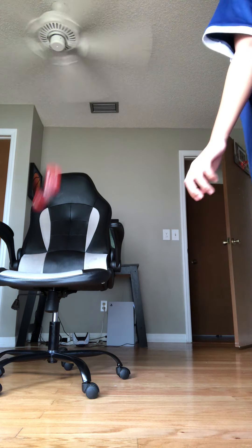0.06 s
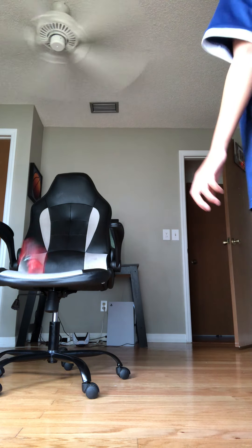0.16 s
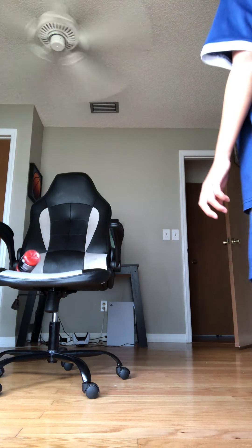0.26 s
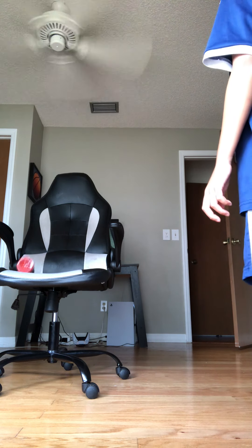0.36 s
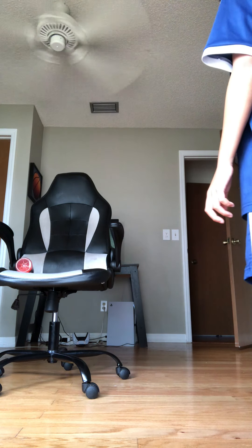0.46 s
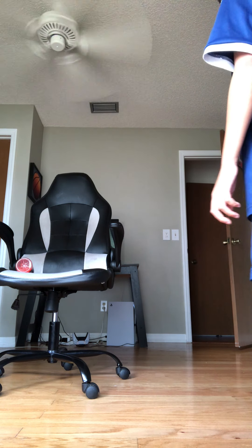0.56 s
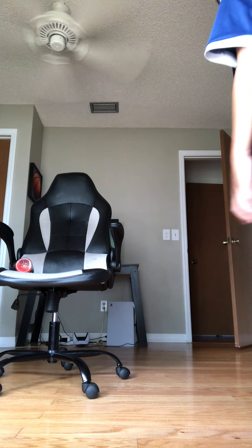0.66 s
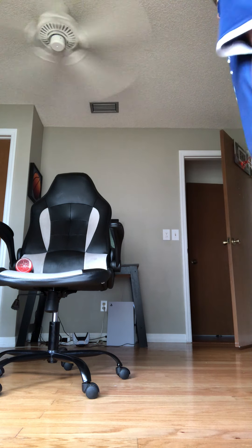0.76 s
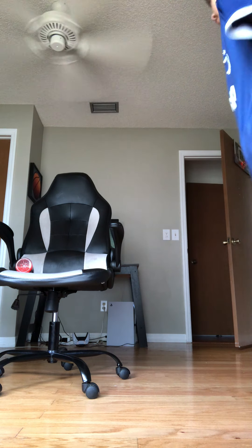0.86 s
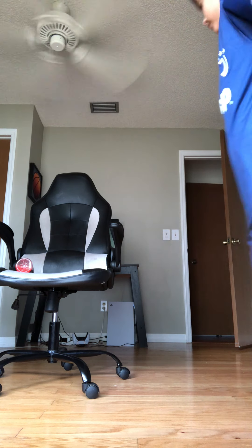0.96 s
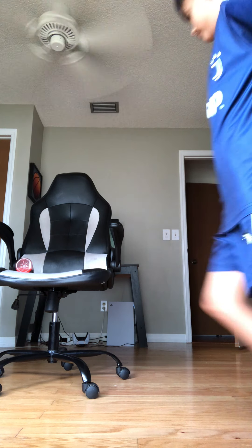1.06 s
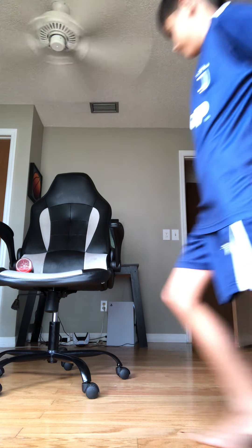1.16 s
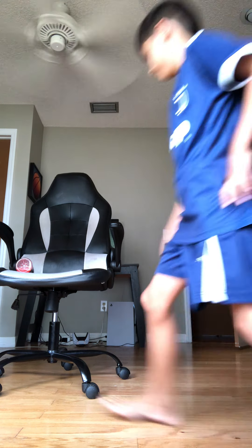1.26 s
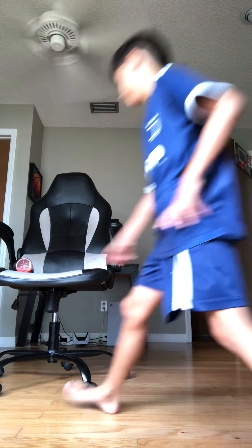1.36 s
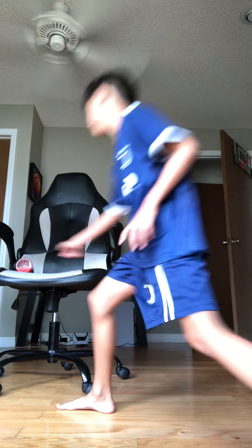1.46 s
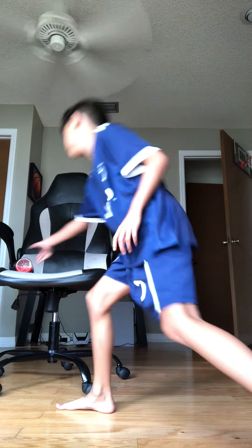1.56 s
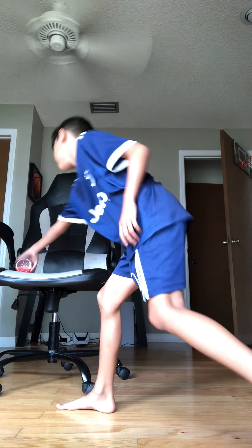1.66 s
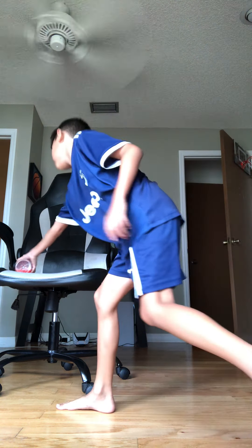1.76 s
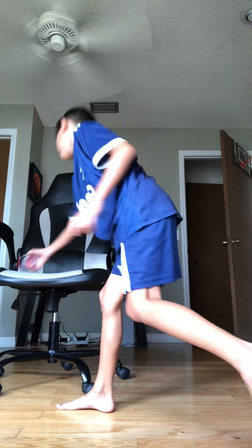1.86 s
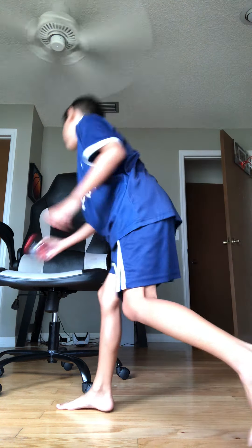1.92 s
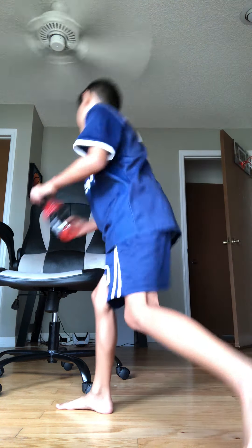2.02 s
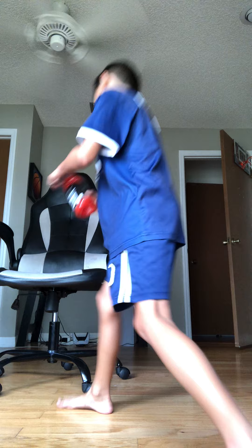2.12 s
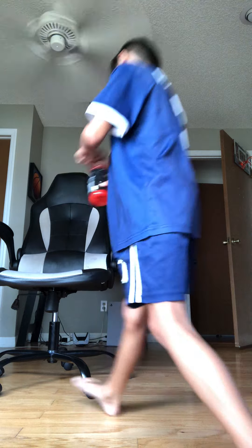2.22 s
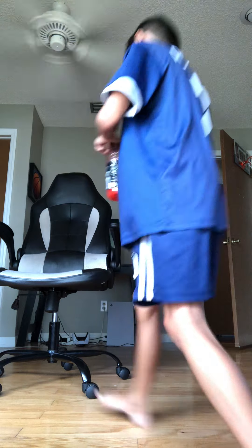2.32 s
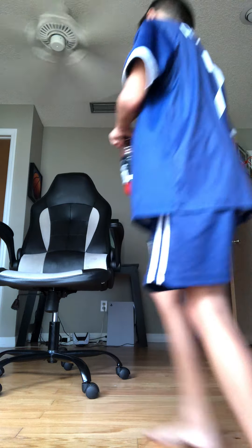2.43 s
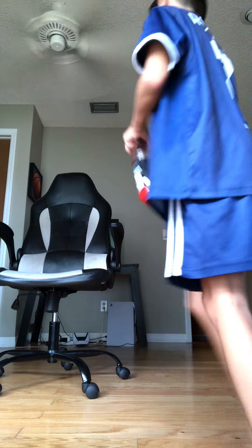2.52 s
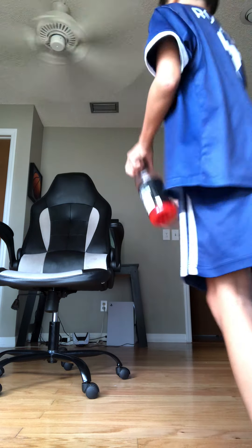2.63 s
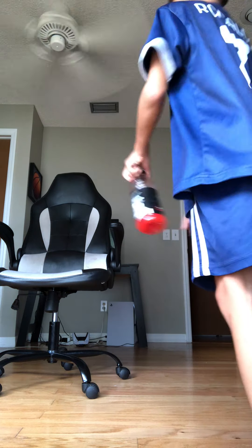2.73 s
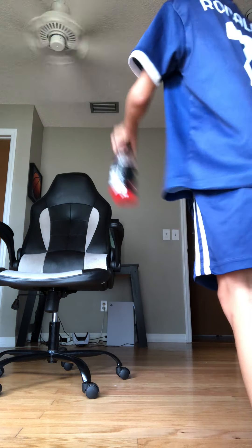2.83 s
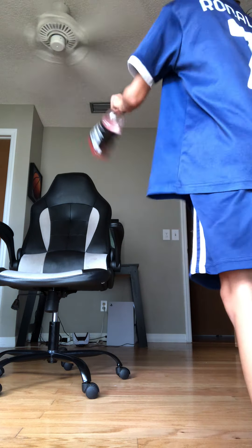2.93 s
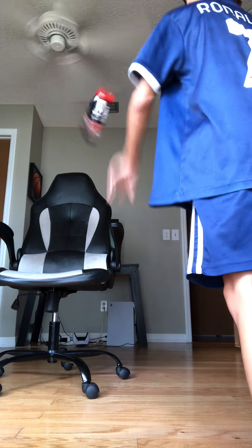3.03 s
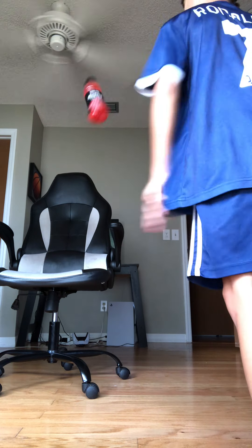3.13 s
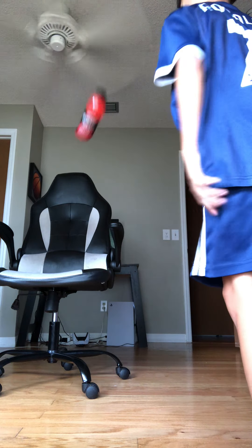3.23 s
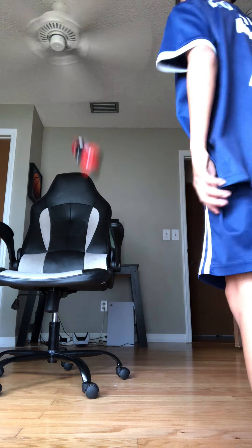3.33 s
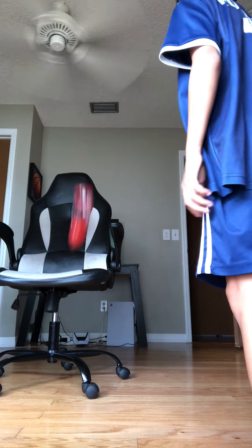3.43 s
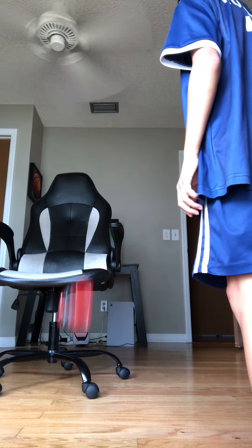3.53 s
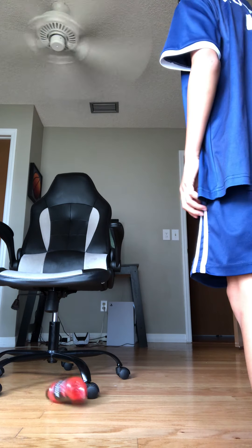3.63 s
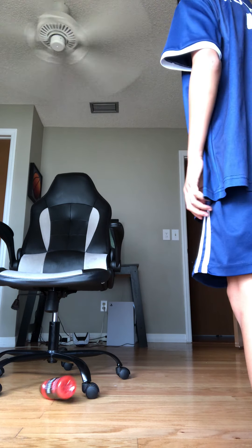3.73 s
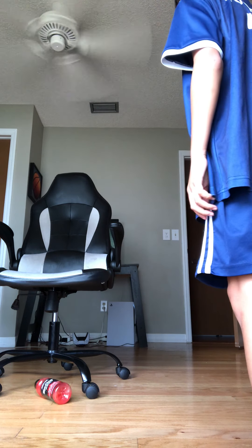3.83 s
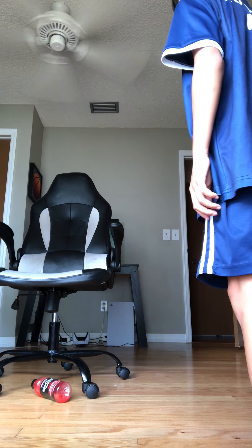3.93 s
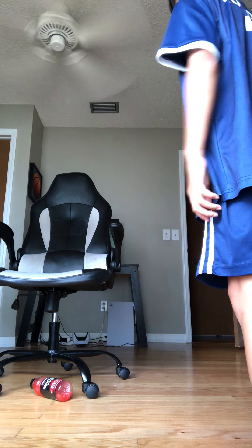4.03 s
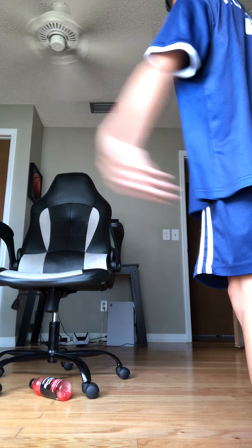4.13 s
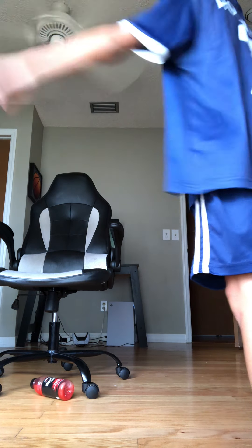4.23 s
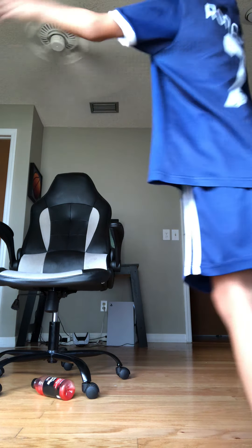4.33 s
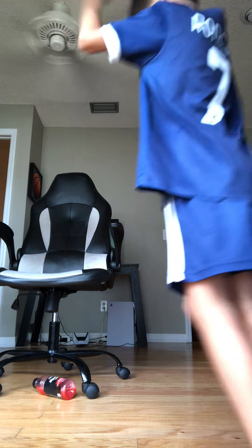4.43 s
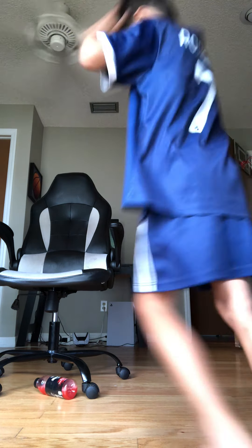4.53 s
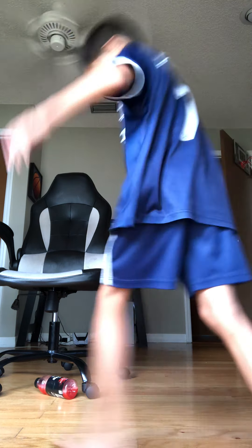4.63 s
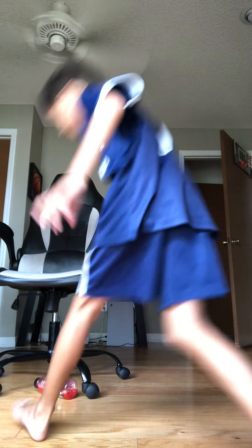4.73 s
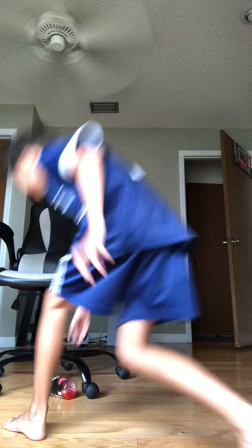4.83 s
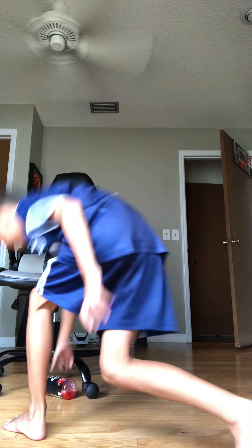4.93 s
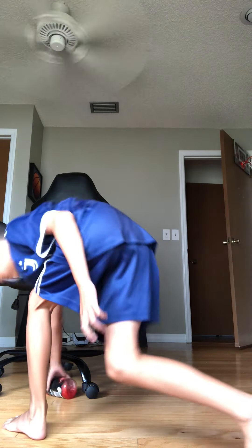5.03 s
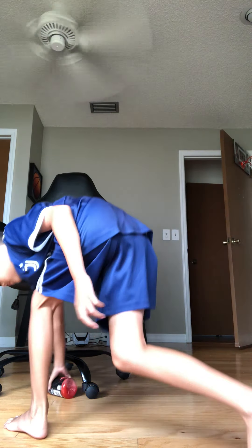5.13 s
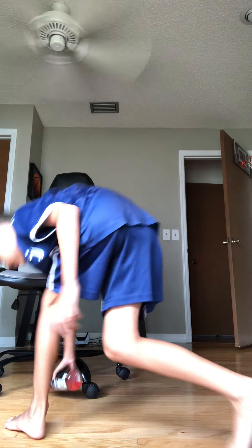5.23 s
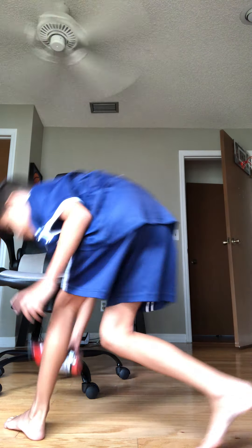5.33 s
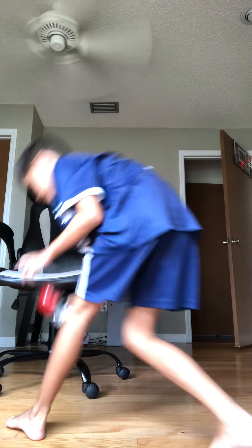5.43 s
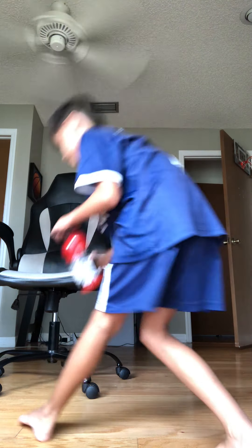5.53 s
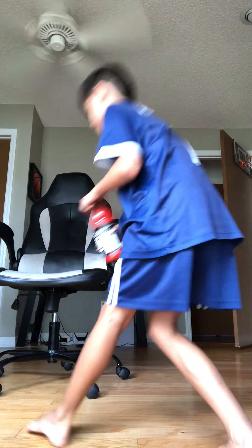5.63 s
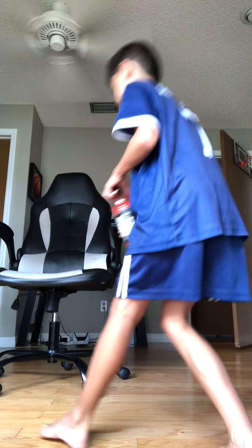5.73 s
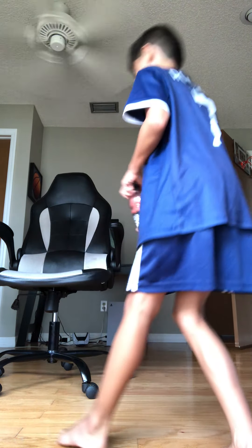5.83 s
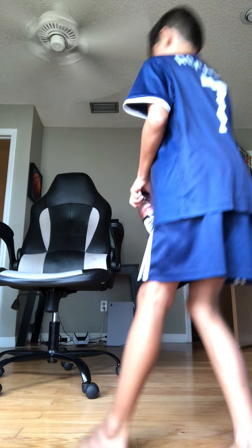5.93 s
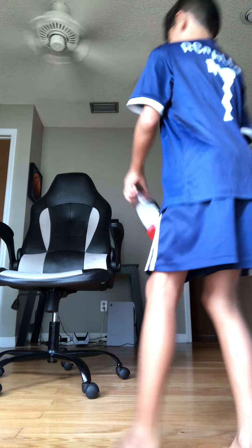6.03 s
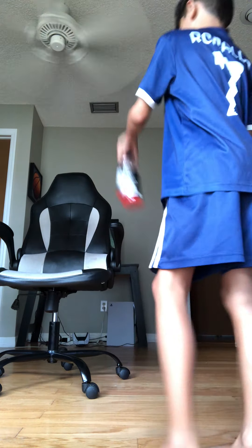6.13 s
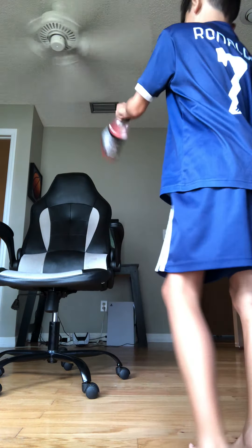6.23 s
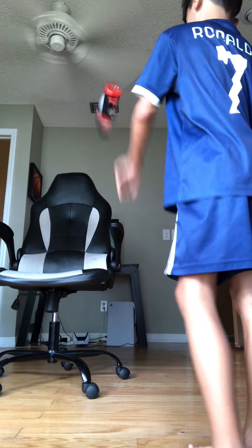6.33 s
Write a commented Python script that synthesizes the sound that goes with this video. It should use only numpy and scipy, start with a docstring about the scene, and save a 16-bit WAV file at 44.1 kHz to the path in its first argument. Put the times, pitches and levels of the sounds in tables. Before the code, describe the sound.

Bottle flipping indoors: dull slap on a cushioned seat, quiet barefoot steps and sloshing, then a hard hollow knock and clatter on floorboards over faint fan hum.

```python
"""A bedroom: a part-filled plastic drink bottle thuds onto a padded chair and later knocks on a wooden floor.
Force pulses ring the modes of seat and boards; noise bursts make slaps, cracks, a splash, taps, ticks and
footfalls. Shaped noise makes sliding feet and, broken into grains, rustling clothes. Short gliding sines make
the drink slosh; resonant bursts make low bumps. A ceiling fan is steady filtered noise with wavering sine hum."""
import sys
import numpy as np
from scipy import signal
from scipy.fft import rfft, irfft
from scipy.io import wavfile

SR = 44100
rng = np.random.default_rng(int(sys.argv[2]) if len(sys.argv) > 2 else 0)


def wav_out(sig):
    """Save sig, one row per channel (or a flat mono array), as 16-bit PCM at SR to the path in sys.argv[1]."""
    wavfile.write(sys.argv[1], SR, np.round(np.clip(np.atleast_2d(sig).T, -1, 1) * 32767).astype(np.int16))


N = 280913
TIME = np.arange(N) / SR

# Levels in the tables are relative: the layer's own trim, filter or room may follow.
# The bottle landing on the chair. Each row: start in seconds, thud level in dB,
# contact length in seconds, slap level in dB.
SEAT_BLOWS = [(0.2702, -12, 0.0028, -33.5), (0.2771, -13.5, 0.0023, -30), (0.2826, -7, 0.0028, -21),
              (0.2939, -36, 0.0015, -35), (0.303, -20.5, 0.0013, -55), (.317, -45, 0.00098, -29.5),
              (0.339, -52, 0.0035, -41), (.374, -54, .002, -34.5)]
# Padded seat with the bottle on it. Each row: mode in Hz, level in dB, 60 dB decay in seconds.
SEAT_MODES = [(85.3, -18, 0.25), (112.6, -8, 0.13), (174.4, 2, 0.029), (253.4, -7, 0.25),
              (326.8, -11.5, 0.24), (418.4, -4, 0.12), (480, -23, .2)]
# The weight of the bottle meeting the floor. Each row: start in seconds, knock level in dB,
# contact length in seconds, board clatter level in dB.
FLOOR_BLOWS = [(3.693, -38.5, 0.0007, -24.5), (3.6987, -19, 0.0018, -12.5), (3.7063, -2, 0.0032, -40),
               (3.727, -13, .0006, -18.5), (3.742, -21.5, 0.00074, -21), (3.764, -22, 0.0035, -28),
               (3.878, -26, 0.0023, -39.5), (3.915, -20.5, 0.0042, -46.5)]
# Floorboards with the bottle on them. Each row: mode in Hz, level in dB, 60 dB decay in seconds.
FLOOR_MODES = [(87.3, -11, 0.12), (124, -22, 0.14), (166, -11, 0.1), (242.4, -5.5, 0.13), (307, -3, .14),
               (331.6, -3.5, 0.16), (378, -6.5, 0.16), (416, -9, 0.11), (511, -9, 0.23), (542, -6, 0.22),
               (567, -3, 0.174), (666, -10, 0.045), (782, -9.5, 0.22), (886, -14.5, 0.06),
               (1020, -14, 0.055), (1100, -20.5, 0.27), (1246, -11, 0.24), (1675, -6, 0.2)]
# The thin shell snapping, then a short splash of the drink at 3.733. Each row: start in seconds,
# level in dB, 60 dB decay in seconds.
SNAPS_AND_SPLASH = [(3.6938, -17, 0.013), (3.7003, -23.5, 0.012), (3.7034, -6, 0.0032),
                    (3.7232, -13, 0.021), (3.7256, -13, 0.011), (3.733, -31, 0.079)]
# Ring of the dented wall facing the microphone. Each row: pitch in Hz, level in dB, width in Hz.
SHELL_RING = [(3250, 7.5, 760), (4840, 2.5, 500)]
# Fingers tapping the bottle. Each row: start in seconds, level in dB.
FINGER_TAPS = [(1.581, -47), (1.636, -43.5), (1.8745, -50), (2.214, -48), (2.323, -42), (2.3722, -40),
               (2.516, -43.5), (3.0705, -32), (3.181, -41), (5.107, -45), (5.117, -52), (5.668, -46),
               (5.8125, -34), (6.362, -41)]
# Small dry ticks close by. Each row: start in seconds, level in dB.
DRY_TICKS = [(4.111, -50.5), (4.468, -42), (4.785, -37), (5.473, -47.5), (5.5722, -46), (5.589, -40.5),
             (6.076, -45)]
# Creaking boards. Each row: start in seconds, level in dB, 60 dB decay of one slip in seconds.
BOARD_CREAKS = [(4.822, -44, .03), (6.226, -47, 0.011)]
# The three quick slips of a creak, the middle one strongest: level of each in dB against its creak.
SLIP_LEVELS = (-6.5, 0.5, -1.5)
# Bare feet taking weight. Each row: start in seconds, level in dB.
FOOTFALLS = [(1.475, -48), (1.78, -52.5), (2.19, -44), (2.37, -51), (5.135, -44.5), (5.48, -50.5),
             (5.592, -49)]
# A sole or smooth fabric sliding. Each row: fastest moment in seconds, level in dB, length in seconds.
SLIDE_STROKES = [(1.268, -50.5, .032), (1.775, -63, 0.028), (1.93, -61, 0.023), (2.415, -60.5, .08),
                 (2.56, -49.5, 0.087), (5.135, -60, 0.07), (5.68, -65.5, 0.18), (5.94, -63, 0.12),
                 (6.19, -65, 0.2)]
# Strides and arm swings in the clothes. Each row: fastest moment in seconds, level in dB, length in seconds.
CLOTH_STROKES = [(.87, -66, .14), (1.06, -63.5, 0.15), (1.33, -62, 0.14), (1.47, -59, 0.17),
                 (1.78, -57.5, 0.092), (1.98, -58, 0.15), (2.22, -54.5, 0.37), (3.09, -47, 0.065),
                 (3.18, -53, 0.12), (4.62, -58.5, 0.019), (5.13, -50.5, 0.061), (5.26, -59, 0.39),
                 (5.66, -66, 0.23), (5.93, -60.5, 0.41), (6.235, -57, 0.032), (6.365, -54, 0.049)]
# Low bumps: drink in the bottle, and a footstep at 4.836. Each row: start in seconds, level in dB,
# 60 dB decay in seconds, pitch of the resonance in Hz.
LOW_BUMPS = [(2.21, -62, 0.18, 405), (3.072, -39, 0.047, 505), (3.13, -44.5, 0.04, 455),
             (4.836, -41.5, 0.033, 342), (5.12, -41.5, 0.046, 395), (5.137, -42.5, 0.063, 234),
             (5.814, -44, 0.021, 567), (6.35, -47.5, 0.1, 560)]
# Jolts that set the drink sloshing. Each row: start in seconds, level in dB.
SLOSH_JOLTS = [(1.96, -63), (2.2, -55), (2.52, -72), (3.15, -54.5), (5.22, -68), (5.41, -62.5), (5.92, -67),
               (6.31, -58)]
# Short gliding rings: bubbles, and a ring under the tap at 5.813. Each row: start in seconds,
# starting pitch in Hz, level in dB.
GLIDING_RINGS = [(1.583, 1600, -50.5), (1.977, 3020, -54.5), (2.231, 3680, -37), (2.323, 1780, -47),
                 (5.247, 1930, -46), (5.444, 3000, -55), (5.813, 1685, -38.5)]
# Fan motor hum and a thin whine. Each row: pitch in Hz, rms level in dB, width in Hz.
FAN_HUM = [(119, -64.5, 0.27), (242.5, -63.5, 1.26), (344, -73.5, 2.9), (371.5, -66, 8), (8660, -89.5, 54)]

# Tone colours of each layer. Each row: frequency in Hz, relative level in dB per Hz.
SLAP_COLOUR = [(100, 0), (400, 9), (700, -1.5), (1000, 1.5), (1500, -5), (2100, -0.5), (3000, -12.5),
               (3600, -8), (6300, -11), (9000, -23), (16000, -34.5)]
CLATTER_COLOUR = [(60, -63), (200, -4.5), (350, 2.5), (560, -2), (750, -7.5), (1150, -3), (1400, -21.5),
                  (1700, -11), (2300, -25.5), (6000, -24.5), (16000, -40)]
SNAP_COLOUR = [(150, -18), (900, -0.5), (1700, 1.5), (2400, -2.5), (2850, 2), (3150, -2), (3600, 1),
               (4100, -3), (4900, 1.5), (5700, -4.5), (7200, -1.5), (10000, -10), (12500, -8.5),
               (16000, -28)]
TAP_COLOUR = [(150, -24), (700, 3.5), (1300, -17.5), (1900, 2.5), (2600, -2), (5200, 1), (8000, -11),
              (12000, -14), (16000, -22.5)]
TICK_COLOUR = [(300, -28), (1500, 2.5), (5000, 1.5), (12000, -1), (16000, -5)]
CREAK_COLOUR = [(300, -33), (900, -14.5), (1600, -6.5), (2300, -14.5), (3200, -22), (8000, -30),
                (16000, -38)]
STEP_COLOUR = [(25, -22), (50, -4), (80, 3.5), (220, 2), (450, 0), (1000, -21.5), (4000, -20.5),
               (16000, -40)]
BUMP_COLOUR = [(50, -40), (140, -2), (230, -2), (310, -2), (470, 0), (700, -10.5), (1200, -15), (3000, -32),
               (8000, -33.5)]
SLIDE_COLOUR = [(200, -0.5), (1200, -3.5), (2500, 0), (6000, 5), (9000, -1.5), (13000, -3.5), (16000, -19)]
CLOTH_COLOUR = [(100, -6.5), (500, 9.5), (1300, 5), (2500, 0), (5000, 2), (8000, -4.5), (10000, -13),
                (13000, -13.5), (16000, -36.5)]
AIR_COLOUR = [(25, -20), (60, -8.5), (110, -8.5), (200, -9), (290, -8.5), (400, -2.5), (560, -17),
              (1000, -20.5), (2500, -29), (6000, -34), (9000, -39.5), (13000, -43.5), (16000, -53)]

# How long the bedroom rings. Each row: frequency in Hz, 60 dB decay in seconds.
ROOM_DECAY = [(60, .36), (250, .52), (600, .47), (2000, .52), (5000, .47), (8000, .38), (16000, .23)]
# Tone of the room tail. Each row: frequency in Hz, relative level in dB.
ROOM_TONE = [(60, 0), (250, 2), (600, 0), (2000, -1.5), (6000, -3), (16000, -1.5)]


def from_db(db):
    """Decibels to gain."""
    return 10 ** (np.asarray(db) / 20)


def rms_one(x):
    """Scale to unit rms."""
    return x / np.sqrt(np.mean(x ** 2) + 1e-20)


def at_hz(points, hz):
    """Read a table on a log-frequency axis."""
    f, value = np.transpose(points)
    return np.interp(np.log(np.maximum(hz, 1)), np.log(f), value)


def colour(x, spectrum, size=4096):
    """Causal, minimum-phase filter of unit energy with the given spectrum."""
    hz = np.fft.rfftfreq(size, 1 / SR)
    cepstrum = irfft(np.log(from_db(at_hz(spectrum, hz))))
    # Folding the cepstrum forward gives minimum phase.
    cepstrum[1:size // 2] *= 2
    cepstrum[size // 2 + 1:] = 0
    response = irfft(np.exp(rfft(cepstrum)))
    return signal.fftconvolve(x, response / np.linalg.norm(response))[:N]


def resonate(x, hz, width_hz):
    """One resonance, gain 1 at its top."""
    return signal.lfilter(*signal.iirpeak(hz, hz / width_hz, fs=SR), x + 1e-18)


def add(out, s, sound):
    """Mix a sound in at time s."""
    start = round(s * SR)
    out[start:start + len(sound)] += sound[:N - start]


def alike(rows, t60):
    """Give contacts of one kind their shared decay time."""
    return [(s, db, t60) for s, db in rows]


def bursts(rows, rise_s=0.00036, count=3):
    """Each contact is a rush of noise, even in spectrum, that swells and dies away."""
    out, t = np.zeros(N), TIME[:SR // 4]
    for s, db, t60 in rows:
        envelope = from_db(db - 60 * t / t60) * (1 - np.exp(-t / rise_s))
        rush = envelope * rng.standard_normal(len(t))
        window = np.sqrt(np.minimum(4 * envelope / envelope.max(), 1))
        # Alternately flatten the spectrum and confine the rush in time.
        for _ in range(count):
            flat = irfft(np.exp(1j * np.angle(rfft(rush))), len(t))
            rush = flat * window
        add(out, s, rush * np.linalg.norm(envelope) / np.linalg.norm(rush))
    return out


def strike(blows, modes, lowest_hz):
    """Half-sine force pulses ring the modes; a longer contact is duller, and deep bass hardly radiates."""
    force, out = np.zeros(N), np.zeros(N)
    for s, db, contact, _ in blows:
        push = np.sin(np.pi * np.minimum(TIME[:SR // 20] / contact, 1))
        add(force, s, from_db(db) * push / push.sum())
    for hz, db, t60 in modes:
        radius = from_db(-60 / (t60 * SR))
        angle = 2 * np.pi * hz / SR
        zeros = [1, -radius * np.cos(angle)]
        poles = [1, -2 * radius * np.cos(angle), radius ** 2]
        out += from_db(db) * signal.lfilter(zeros, poles, force + 1e-18)
    radiation = signal.butter(4, [lowest_hz, 2500], "band", fs=SR, output="sos")
    return signal.sosfilt(radiation, out)


def strokes(rows, rise_share):
    """Loudness of rubbing: each stroke speeds up and slows down in a lopsided bell."""
    power = np.zeros(N)
    for s, db, length in rows:
        width = length * np.where(TIME < s, rise_share, 1 - rise_share)
        power += from_db(db) ** 2 * np.exp(-2 * np.minimum(((TIME - s) / width) ** 2, 20))
    return np.sqrt(power)


def room_tail(build_s=0.0044, count=12):
    """Wall echoes thicken within milliseconds, then die away, the highest treble fastest."""
    t = TIME[:SR]
    hz, noise = np.fft.rfftfreq(SR, 1 / SR), rfft(rng.standard_normal(SR))
    centres = np.geomspace(60, 16000, count)
    tail = np.zeros(SR)
    # Each row of the identity picks one overlapping band.
    for centre, pick in zip(centres, np.eye(count)):
        band = irfft(noise * at_hz(np.c_[centres, pick], hz), SR)
        fade = from_db(-60 * t / at_hz(ROOM_DECAY, centre)) * (1 - np.exp(-(t / build_s) ** 2))
        tail += band * fade / np.linalg.norm(fade) * from_db(at_hz(ROOM_TONE, centre))
    return tail


def in_room(x, tail, wet_db):
    """Direct sound plus the room's answer."""
    return x + from_db(wet_db) * signal.fftconvolve(x, tail)[:N]


def snaps(rows, tail, wet_db):
    """The direct snap is a noise burst; the room tail is fed one click of matching energy."""
    clicks = np.zeros(N)
    for s, db, t60 in rows:
        # A longer snap carries more energy, so its click is stronger.
        add(clicks, s, from_db([db]) * np.sqrt(t60 * SR / np.log(10 ** 6)))
    return bursts(rows) + from_db(wet_db) * signal.fftconvolve(clicks, tail)[:N]


def fan(air_db=-58):
    """Steady moving air is filtered noise; the motor's hum is sines whose phase wanders."""
    out = from_db(air_db) * colour(rng.standard_normal(N), AIR_COLOUR)
    for hz, db, width in FAN_HUM:
        wander = np.cumsum(rng.standard_normal(N)) * np.sqrt(2 * np.pi * width / SR)
        out += from_db(db) * np.sqrt(2) * np.sin(2 * np.pi * hz * TIME + wander)
    return out


def chair_landing(tail, slap_t60=0.041, crinkle_db=2.5):
    """The cushion thuds while the bottle slaps its cover and its plastic crinkles."""
    # The crinkle is a random level held for 40 samples at a time.
    levels = np.repeat(rng.standard_normal(N // 40 + 1), 40)[:N]
    crinkle = rms_one(from_db(crinkle_db * levels))
    slap_rows = [(s, db, slap_t60) for s, _, _, db in SEAT_BLOWS]
    slaps = colour(crinkle * bursts(slap_rows, rise_s=0.00049), SLAP_COLOUR)
    thud = strike(SEAT_BLOWS, SEAT_MODES, lowest_hz=96)
    return in_room(thud, tail, wet_db=-13.5) + in_room(slaps, tail, wet_db=3)


def rustle(tail, grains_per_s=2200, spread_db=1.0, clump_db=3, level_db=-3, count=500):
    """Cloth rubs in fine grains of uneven size that come in clumps as folds catch."""
    motion = from_db(level_db) * strokes(CLOTH_STROKES, rise_share=0.45)
    clump_times = np.linspace(0, TIME[-1], count)
    clumps = from_db(clump_db * np.interp(TIME, clump_times, rng.standard_normal(count)))
    sizes = from_db(spread_db * np.minimum(rng.exponential(1, N), 4)) * rng.standard_normal(N)
    hits = rng.random(N) < grains_per_s / SR
    grains = rms_one(clumps * sizes * hits)
    return in_room(colour(motion * grains, CLOTH_COLOUR), tail, wet_db=-2.0)


def feet(tail, step_db=7, creak_db=1, step_t60=0.07, slip_gap_s=0.009):
    """Soft footfalls, boards creaking in quick slips, and the hiss of sliding soles and fabric."""
    slide = strokes(SLIDE_STROKES, rise_share=0.39) * rng.standard_normal(N)
    slides = colour(slide, SLIDE_COLOUR)
    steps = colour(bursts(alike(FOOTFALLS, step_t60), rise_s=0.0035), STEP_COLOUR)
    slips = []
    for s, db, t60 in BOARD_CREAKS:
        for k, slip_db in enumerate(SLIP_LEVELS):
            slips.append((s + k * slip_gap_s, db + slip_db, t60))
    creaks = colour(bursts(slips, rise_s=0.00057), CREAK_COLOUR)
    soles = in_room(from_db(step_db) * steps + slides, tail, wet_db=-0.5)
    return soles + in_room(from_db(creak_db) * creaks, tail, wet_db=-2.5)


def handling(tail, tap_t60=0.014, tick_t60=0.0072):
    """Fingers tap the shell, low bumps sound, and something ticks nearby."""
    taps = colour(snaps(alike(FINGER_TAPS, tap_t60), tail, wet_db=-2.5), TAP_COLOUR)
    ticks = colour(snaps(alike(DRY_TICKS, tick_t60), tail, wet_db=-6.5), TICK_COLOUR)
    return taps + ticks + in_room(low_bumps(), tail, wet_db=2.5)


def slosh(tail, low_hz=1600, high_hz=6000, fizz_cycles=18, count=600):
    """Many small bubbles ring in the moving drink, and a few single rings stand out."""
    fizz = np.zeros(N)
    for when, size, weakness in rng.random((count, 3)):
        hz = low_hz * (high_hz / low_hz) ** size
        add(fizz, when * TIME[-1], from_db(-18 * weakness) * gliding_ring(hz, fizz_cycles))
    out = rms_one(fizz) * surges()
    for s, hz, db in GLIDING_RINGS:
        add(out, s, from_db(db) * gliding_ring(hz))
    return in_room(out, tail, wet_db=1.0)


def gliding_ring(hz, cycles=40, glide=2.8):
    """A brief ring rising in pitch, as of a bubble; it falls 60 dB over the given cycles of its first pitch."""
    t = TIME[:SR // 25]
    return np.sin(2 * np.pi * hz * t * (1 + glide * t)) * from_db(-60 * t * hz / cycles)


def surges(rise_s=0.025, t60=0.5):
    """Agitation of the drink: it builds after each jolt and settles again."""
    out, t = np.zeros(N), TIME[:SR]
    for s, db in SLOSH_JOLTS:
        add(out, s, from_db(db - 60 * t / t60) * (1 - np.exp(-t / rise_s)))
    return out


def low_bumps(ring_width_hz=57, ring_db=3):
    """Each bump, of the drink or a foot, is a noise burst that also rings a resonance at its own pitch."""
    out = np.zeros(N)
    for s, db, t60, hz in LOW_BUMPS:
        bump = bursts([(s, db, t60)])
        out += bump + from_db(ring_db) * resonate(bump, hz, ring_width_hz)
    return colour(out, BUMP_COLOUR)


def floor_landing(tail, clatter_t60=0.031, snap_db=0.5, clatter_db=3.0):
    """The shell snaps, the weight of the drink knocks the boards, the boards clatter and the drink splashes."""
    clatter_rows = [(s, db, clatter_t60) for s, _, _, db in FLOOR_BLOWS]
    clatter = colour(bursts(clatter_rows, rise_s=0.00048), CLATTER_COLOUR)
    knock = in_room(strike(FLOOR_BLOWS, FLOOR_MODES, lowest_hz=137.0), tail, wet_db=-11.5)
    boards = in_room(from_db(clatter_db) * clatter, tail, wet_db=3.0)
    return knock + from_db(snap_db) * snaps_and_splash(tail) + boards


def snaps_and_splash(tail):
    """The thin shell snaps and its dented wall rings; a longer burst is the splash, through the same ring."""
    burst = bursts(SNAPS_AND_SPLASH)
    ring = sum(from_db(db) * resonate(burst, hz, width) for hz, db, width in SHELL_RING)
    return ring + colour(snaps(SNAPS_AND_SPLASH, tail, wet_db=-1.5), SNAP_COLOUR)


def scene():
    """The bottle, feet and clothes share one room; the fan is added without a tail."""
    tail = room_tail()
    sources = (chair_landing, rustle, feet, handling, slosh, floor_landing)
    return (fan() + sum(source(tail) for source in sources))[None]


def record(dry):
    """The phone microphone drops the deep bass below 38 Hz and cuts the top above 16.2 kHz."""
    thin = signal.sosfilt(signal.butter(3, 38, "high", fs=SR, output="sos"), dry)
    return signal.sosfilt(signal.ellip(12, .1, 80, 16200, fs=SR, output="sos"), thin)


dry = scene()
out = record(dry)
wav_out(out)
```